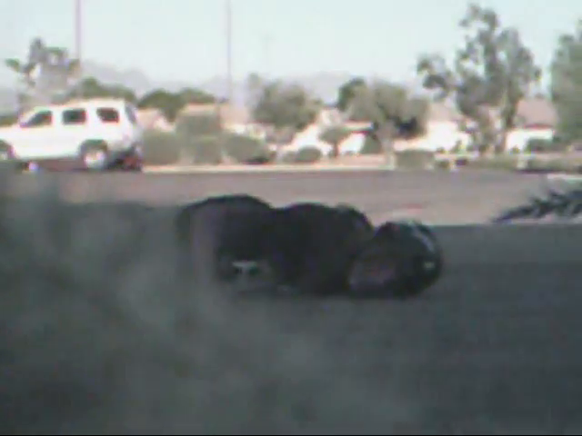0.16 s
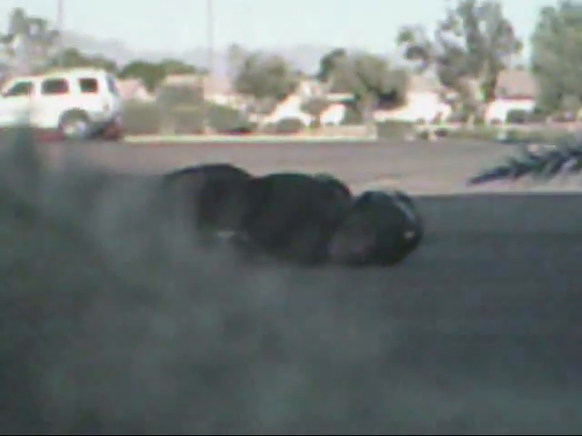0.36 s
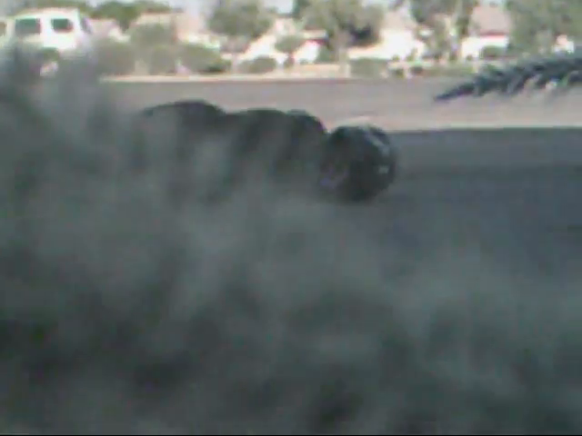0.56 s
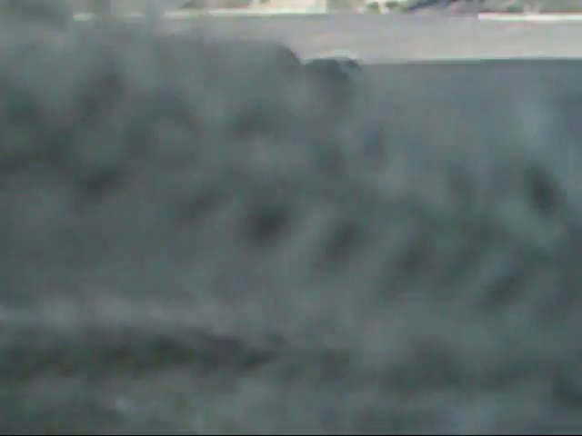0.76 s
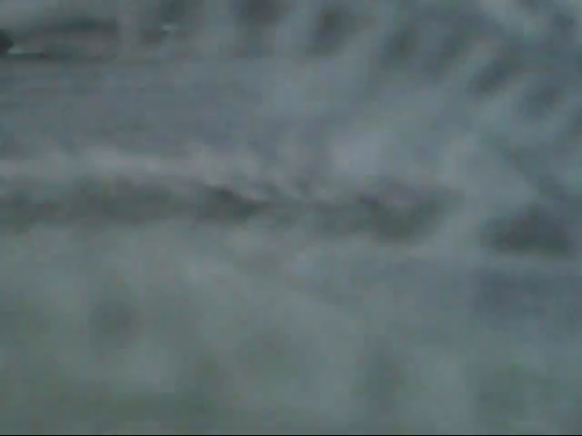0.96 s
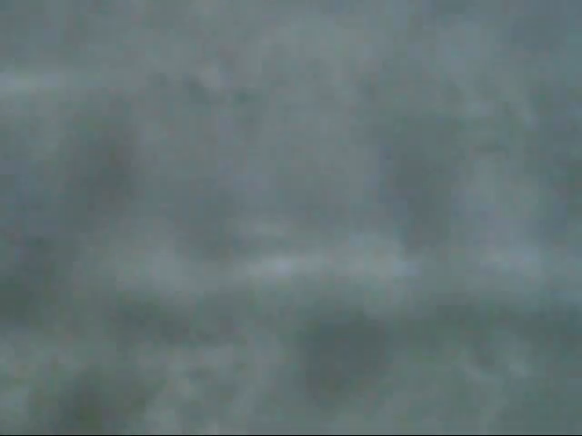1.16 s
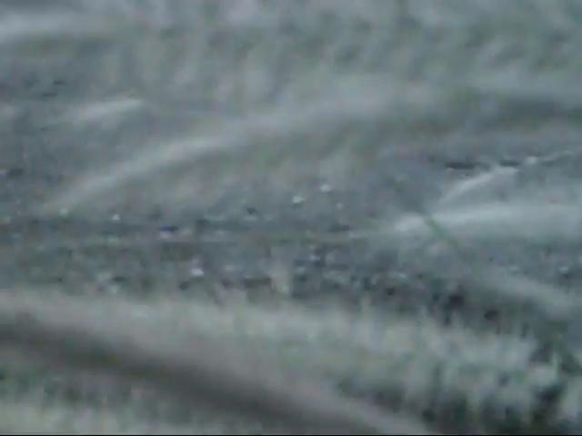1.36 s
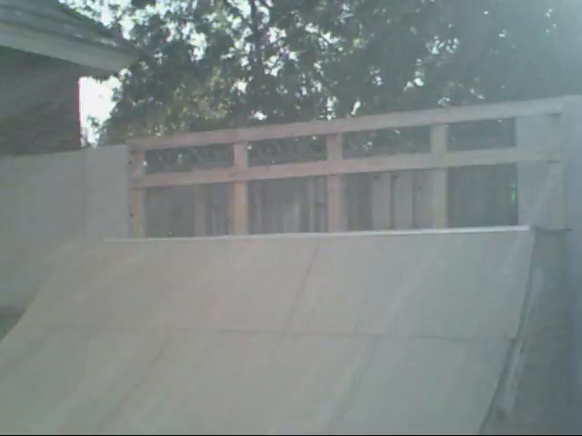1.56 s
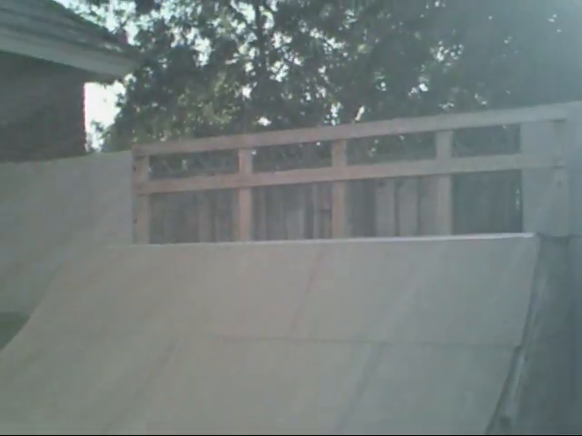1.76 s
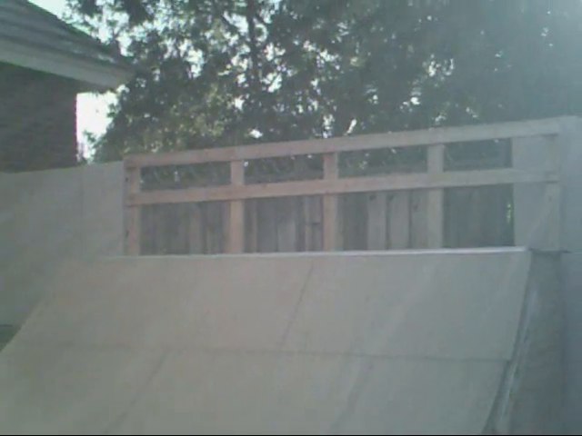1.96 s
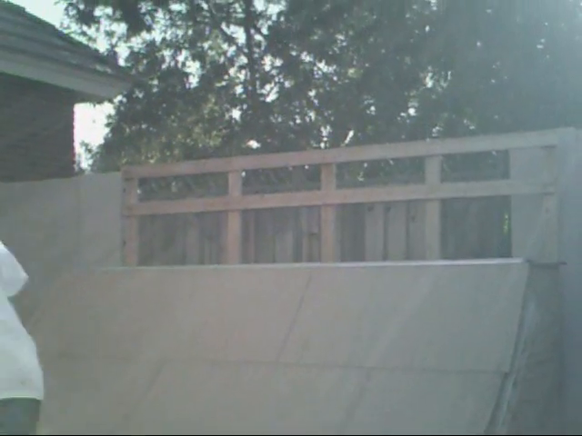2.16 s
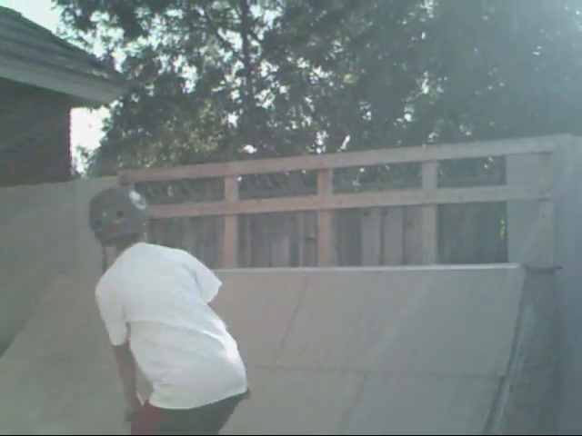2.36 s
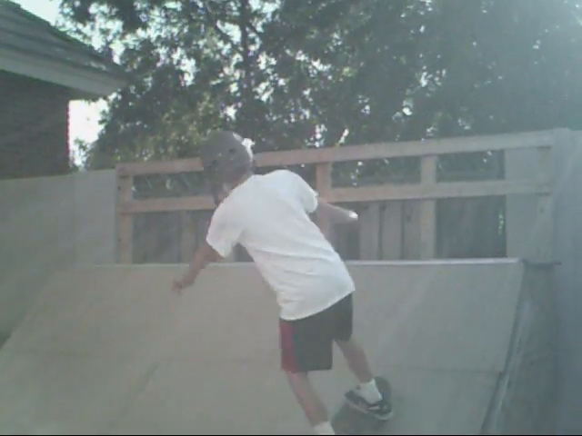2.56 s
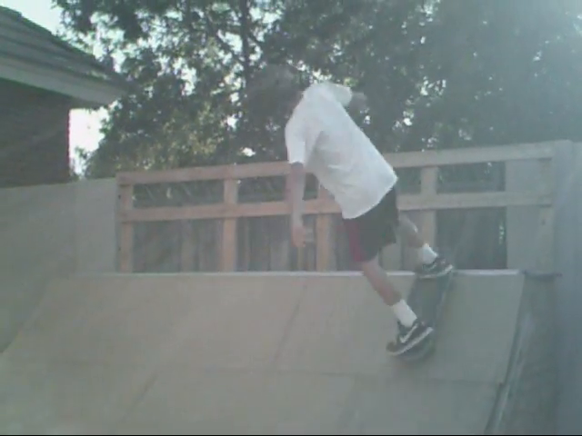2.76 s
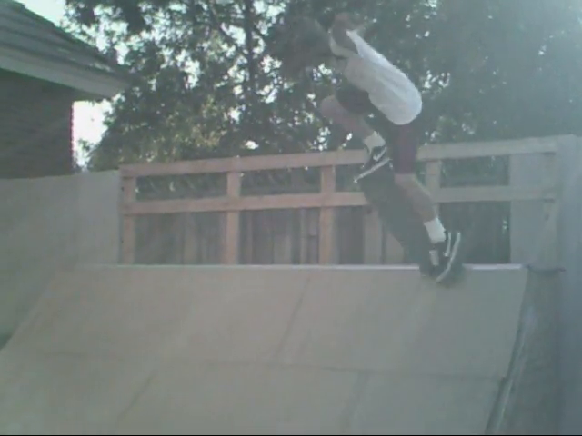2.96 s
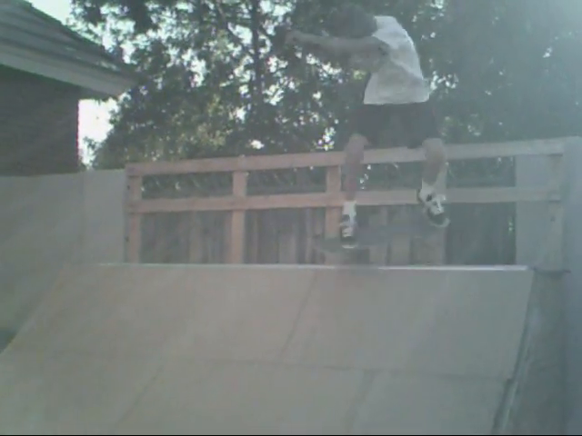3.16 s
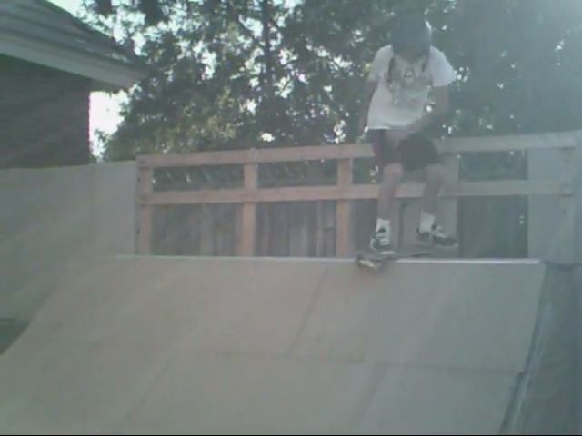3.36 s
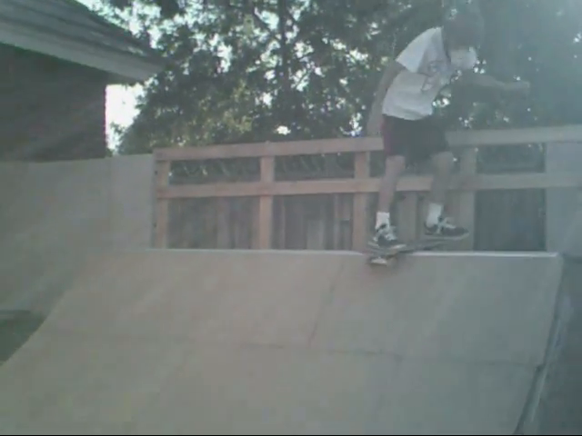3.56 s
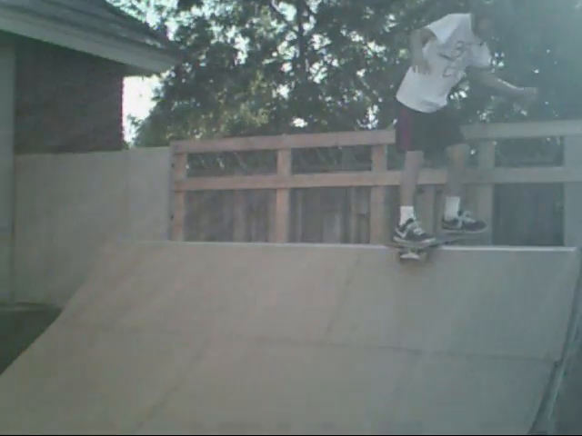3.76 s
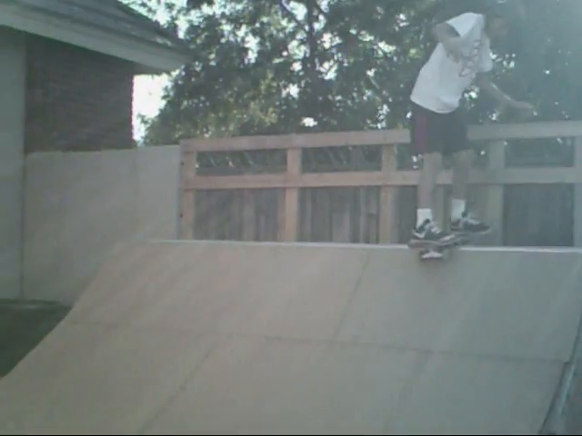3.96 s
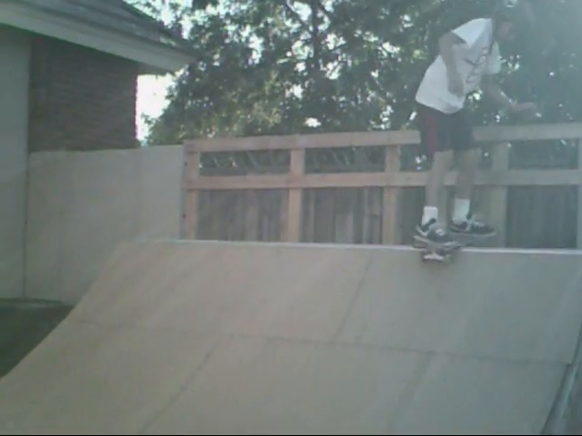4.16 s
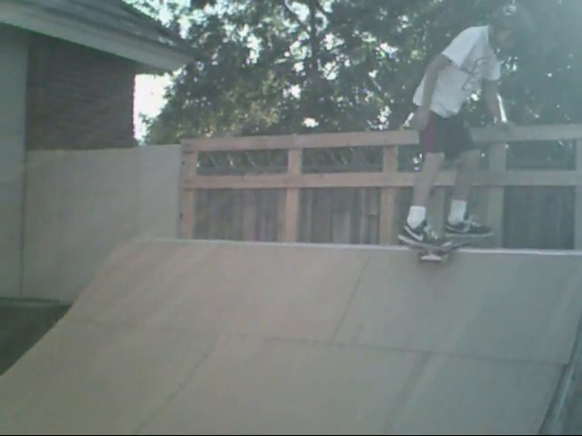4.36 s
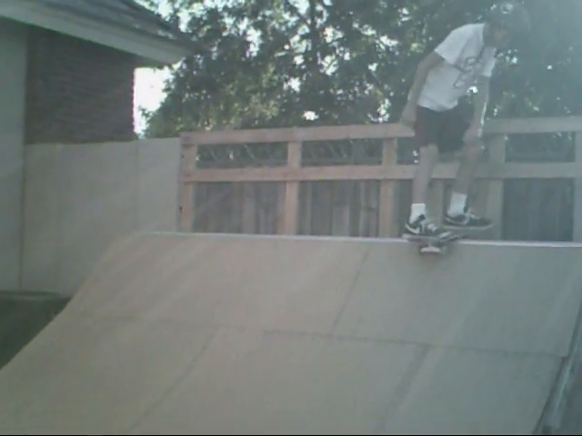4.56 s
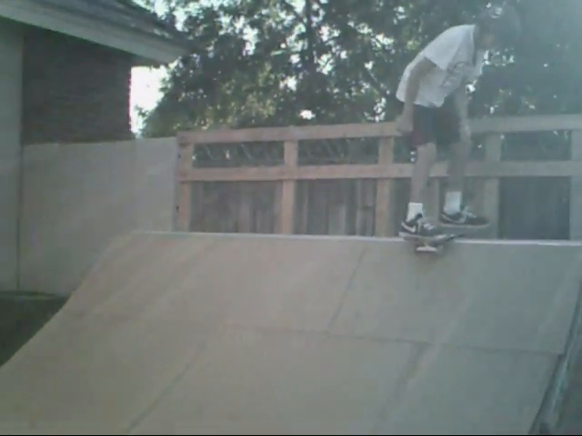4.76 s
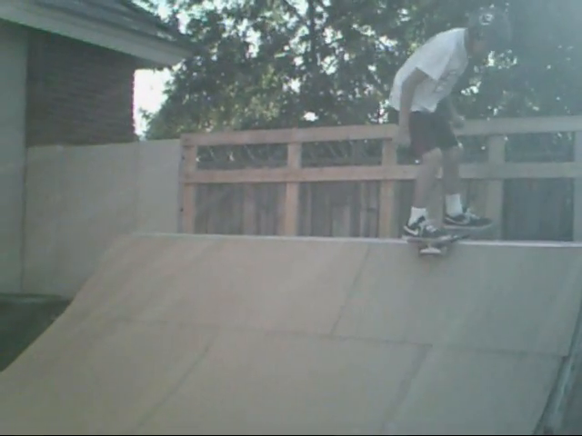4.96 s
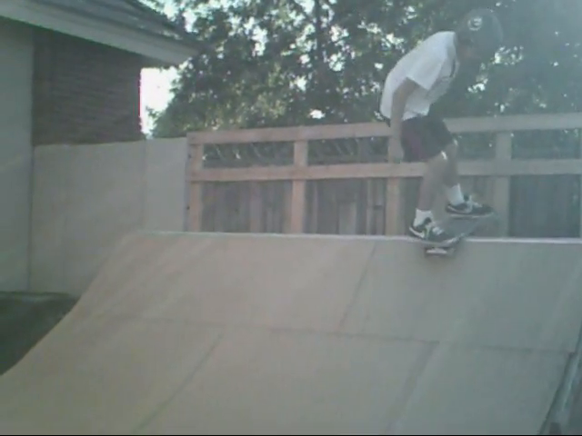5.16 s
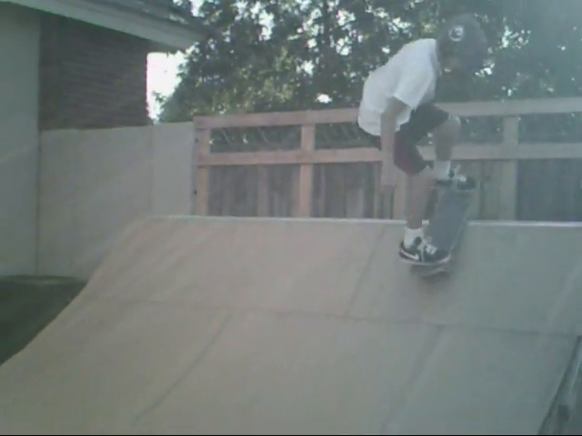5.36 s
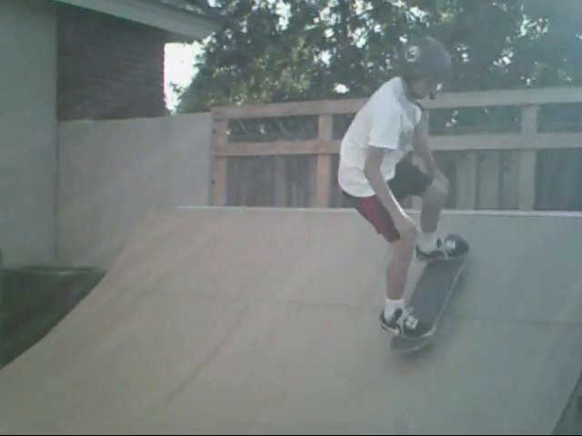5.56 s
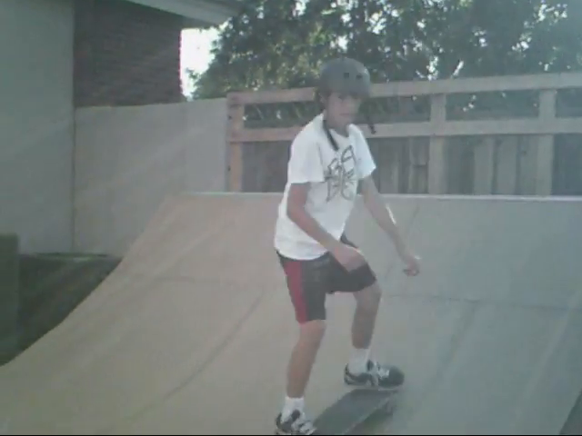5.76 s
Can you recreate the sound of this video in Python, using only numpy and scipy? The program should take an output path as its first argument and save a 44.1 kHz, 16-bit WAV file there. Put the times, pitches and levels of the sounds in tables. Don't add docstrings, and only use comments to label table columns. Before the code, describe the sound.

Outdoors, a low unsteady machine hum over distant traffic runs first, then drops out for a moment. A skateboard thumps loudly onto a hollow plywood ramp, rolls up with rumbling and knocks, and clacks sharply on the steel lip. It rests with faint creaks, then drops in with a crushing, clipped slam and rolls on. A cheap camera microphone adds thin whine and hiss.

```python
import sys
import numpy as np
from scipy import signal
from scipy.fft import rfft, irfft, next_fast_len
from scipy.io import wavfile
from scipy.ndimage import uniform_filter1d, map_coordinates

SR = 44100
rng = np.random.default_rng(int(sys.argv[2]) if len(sys.argv) > 2 else 0)


def persist_wave(psi):
    counts = np.round(np.clip(psi, -1, 1) * 32767).astype(np.int16)
    wavfile.write(sys.argv[1], SR, np.atleast_2d(counts).T)


def voltage_ratio(level):
    return 10 ** (np.asarray(level, float) / 20)


N = 255780
T = np.arange(N) / SR

DROPOUT_START_S, DROPOUT_END_S = 1.5195, 1.5855
LANDING_S = 1.6868
GAIN_CUT_S = 5.541

# centre_hz, width_hz, level_db
RAMP_FRAME = [(105.5, 42, -3), (147.3, 21.2, 1), (179.1, 28.6, -3.5), (233.7, 66.6, -5.5)]
# centre_hz, width_hz, level_db
RIDING_SHEET = [(310, 50, -0.5), (442.2, 110, -5), (601.8, 90, -6), (767, 132, -9)]
# start_s, end_s, level_db
WHEEL_SLAPS = [
    (5.4915, 5.496, 0),
    (5.4978, 5.5143, 7),
    (5.5165, 5.5192, 5),
    (5.5205, 5.5218, 3),
]


def unit(x):
    return x / np.sqrt(np.mean(x ** 2) + 1e-20)


def peak(x):
    return x / np.max(np.abs(x))


def along(points, hz):
    f, v = np.transpose(points)
    return np.interp(np.log(hz + 1), np.log(f + 1), v)


def curves(rows):
    s, *cols = np.transpose(rows)
    return [np.interp(T, s, c) for c in cols]


def during(start_s, end_s):
    return (T >= start_s) & (T < end_s)


def wobble(rate):
    knots = rng.standard_normal(int(N * rate / SR) + 4)
    return map_coordinates(knots, [np.arange(N) * rate / SR])


def filtered(x, response):
    m = next_fast_len(x.shape[-1] + 8192)
    return irfft(rfft(x, m) * response(np.fft.rfftfreq(m, 1 / SR)), m)[..., :x.shape[-1]]


def resonances(modes):
    return lambda f: sum((-1) ** k * voltage_ratio(db) * 1j * f * w / (c * c - f * f + 1j * f * w)
                         for k, (c, w, db) in enumerate(modes))


def coloured(spectrum):
    return unit(filtered(rng.standard_normal(N), lambda hz: voltage_ratio(along(spectrum, hz))))


def bumps(rate, spread_db, share):
    struck = rng.random(N) < rate / SR
    size = rng.uniform(-0.85, 1, N) * voltage_ratio(spread_db * rng.exponential(size=N).clip(0, 2))
    return share * unit(struck * size) + rng.standard_normal(N)


def whine():
    # pitch_hz, level_db
    circuit_tones = [(5599, -100), (5981, -97), (6611, -77), (7402, -80.5), (9700, -85)]
    tones = sum(np.sqrt(2) * voltage_ratio(db) * np.sin(2 * np.pi * hz * T) for hz, db in circuit_tones)
    return tones + voltage_ratio(-62.5) * rng.standard_normal(N)


def street():
    # time_s, level_db
    hum_swell = [(0.0, -32.5), (0.12, -28), (0.294, -33), (0.328, -28.5), (0.802, -38.5), (0.882, -32.5),
                 (1.19, -36.5), (1.362, -26.5), (1.51, -33)]
    # time_s, second_db, third_db
    partial_swell = [(0, -42, -52), (.15, -42, -53), (.28, -38.5, -44), (.36, -46, -47), (.45, -40.5, -50),
                     (.55, -47, -53), (.64, -41.5, -47), (.74, -50.5, -49), (.87, -44, -38.5),
                     (.96, -40.5, -48.5), (1.1, -46.5, -49), (1.2, -39.5, -51.5), (1.3, -41.5, -52),
                     (1.37, -49, -51), (1.51, -43, -47)]
    # pitch_hz, level_db (per Hz)
    traffic_spectrum = [(15, -20), (40, -3.5), (90, -1.5), (180, -4), (300, -11.5), (600, -14), (1000, -18),
                        (1500, -26.5), (2200, -37.5), (3500, -45.5), (9500, -54), (11000, -50)]
    # time_s, level_db
    brush = [(1.388, -59), (1.391, -44), (1.41, -50), (1.432, -55), (1.447, -46), (1.456, -50),
             (1.478, -51.5), (1.509, -55), (1.52, -55)]
    # pitch_hz, level_db (per Hz)
    leaf_spectrum = [(1350, -46), (2300, -13), (2900, -3), (3400, -9), (4130, -9), (4910, -5), (6860, -5),
                     (10700, -13), (13900, -49), (22000, -120)]
    turn = 2 * np.pi * np.cumsum(251 + 1.66 * wobble(11.74)) / SR
    hum = voltage_ratio(curves(hum_swell)[0] + 2 * wobble(22)) * np.sin(turn)
    overtones = sum(voltage_ratio(db + 1.5 * wobble(18.1)) * np.sin((k + 2) * turn)
                    for k, db in enumerate(curves(partial_swell)))
    traffic = voltage_ratio(-32.5 + 0.52 * wobble(5.5)) * coloured(traffic_spectrum)

    def leaf_response(hz):
        colour = voltage_ratio(along([(1700, -40)] + list(leaf_spectrum)[1:], hz))
        return colour * (1 + resonances([(3350, 500, 1)])(hz))

    scratch = bumps(500, spread_db=2.5, share=0.6) * voltage_ratio(1.3 * wobble(60))
    leaves = unit(filtered(scratch, leaf_response))
    rustle = voltage_ratio(curves(brush)[0]) * leaves * during(brush[0][0], brush[-1][0])
    return (np.sqrt(2) * (hum + overtones) + traffic + rustle) * (T < DROPOUT_START_S)


def wind():
    # start_s, level_db
    jolt_events = [(1.685, -25), (1.75, -40), (2.02, -33), (2.17, -34), (2.45, -44), (3.33, -18),
                   (3.41, -20.5), (3.7, -33), (4.28, -39), (4.42, -34), (4.6, -35), (5.2, -26), (5.51, -20),
                   (5.6, -34)]
    # pitch_hz, level_db (per Hz)
    buffet_spectrum = [(12, -2.5), (30, -10.5), (70, -5.5), (110, -18), (160, -59.5)]
    # time_s, level_db
    murmur_level = [(1.58, -60), (1.69, -47), (3.3, -46), (3.6, -42.5), (3.9, -46), (4.3, -43),
                    (4.7, -38.5), (5.1, -34.5), (5.5, -27.5), (5.55, -60), (5.8, -33)]
    # pitch_hz, level_db (per Hz)
    murmur_spectrum = [(53, -26), (90, -10.5), (189, 6), (260, 1.5), (330, -25), (613, -6), (811, -4.5),
                       (1120, -19), (1510, -16.5), (1770, -24), (2340, -18.5), (6750, -36), (10700, -47),
                       (13900, -75), (22000, -120)]
    # centre_hz, width_hz, level_db
    drones = [(790, 100, -1.5), (1519, 110, 8)]
    rise_s, t60_s = 0.012, 0.474
    jolts = 0
    for s, db in jolt_events:
        u = (T - s).clip(0)
        jolts = jolts + voltage_ratio(db - 60 * u / t60_s) * (1 - np.exp(-u / rise_s))
    breeze = voltage_ratio(-37 + 3 * wobble(16) - 26 * (T < LANDING_S))
    buffet = unit(voltage_ratio(1.5 * wobble(22)) * coloured(buffet_spectrum))
    murmur = unit(filtered(coloured(murmur_spectrum), lambda f: 1 + resonances(drones)(f)))
    return (breeze + jolts) * buffet + voltage_ratio(curves(murmur_level)[0]) * murmur


def shuffles():
    # start_s, length_s, level_db
    drags = [(1.67, 0.15, -49), (1.902, 0.26, -53), (3, 0.45, -52.5), (3.91, 0.24, -56),
             (4.114, 0.067, -65), (4.468, 0.12, -53.5), (5.174, 0.12, -55), (5.347, 0.077, -46),
             (5.543, 0.039, -28.5), (5.521, 0.02, -21.5), (5.42, 0.092, -41.5), (3.43, 0.35, -58)]
    # centre_hz, width_hz, level_db
    sole_modes = [(3400, 780, -4.5), (4830, 900, -4.5), (7500, 2200, -7)]
    drag = sum(voltage_ratio(db) * np.sin(np.pi * ((T - s) / length).clip(0, 1)) for s, length, db in drags)
    rub = bumps(500, spread_db=2.5, share=0.7) * voltage_ratio(2 * wobble(50))
    grains = filtered(rub, lambda f: resonances(sole_modes)(f) / (1 + (2500 / (f + 1)) ** 4))
    return drag * unit(grains)


def ticks():
    # start_s, level_db, centre_hz
    creaks = [(0.3256, -33, 5270), (0.928, -43, 4030), (0.9694, -42, 4770), (1.4451, -47, 4980),
              (3.909, -38, 4600), (4.0294, -50, 7960), (4.2716, -34, 5000), (4.36, -43, 4750),
              (4.877, -37, 4150), (4.9264, -37, 4700), (4.9906, -34, 4990), (5.016, -32, 4900),
              (5.03, -38, 4800), (5.063, -31, 4470), (5.088, -37, 4500), (5.1103, -45, 4700),
              (5.148, -34, 5170), (5.1755, -28, 4740), (5.193, -29, 6500), (5.2034, -26, 6500),
              (5.2433, -36, 5230), (5.287, -23, 4070), (5.3307, -23.5, 4650), (5.42, -21, 4230)]
    # start_s, level_db, centre_hz, width_hz, t60_s
    snaps = [(5.6052, -24, 3800, 1200, .015), (3.3333, -5, 2200, 2000, .012), (5.588, -11, 3300, 700, .03),
             (2.178, -15, 450, 300, .08), (1.6866, -9, 800, 600, .03), (1.7645, -11, 400, 400, .08),
             (3.332, -7, 760, 110, .12), (1.3903, -20, 8600, 4000, .015), (5.4195, -21, 2300, 900, .02),
             (2.9095, -20, 4500, 3000, .03), (5.5868, -21, 8500, 3500, .04), (3.6985, -19, 1450, 260, .07),
             (3.701, -20, 1950, 300, .06), (3.571, -30, 1400, 170, .08), (1.389, -38, 3000, 2000, .03),
             (3.345, -11, 145, 45, .2), (2.909, -15, 1300, 350, .05), (5.229, -21, 1330, 200, .05),
             (1.698, -10, 570, 90, .13), (3.71, -24, 170, 50, .2), (.3249, -33, 1900, 700, .02)]
    # start_s, level_db, centre_hz
    shivers = [(1.4685, -39, 3300), (1.481, -41, 3300), (1.487, -45, 6500), (1.497, -41, 3200),
               (1.885, -36, 8500), (1.91, -48, 9000), (2.009, -38, 8800), (2.018, -38, 7500),
               (2.074, -35, 7000), (2.117, -44, 9000), (2.134, -42, 9800), (2.172, -39, 8500),
               (2.18, -43, 7370), (2.33, -44, 7100), (3.96, -44, 4780), (4.031, -53, 7800),
               (4.953, -49, 8500), (4.969, -49, 9000), (5.056, -40, 7500), (5.231, -28.5, 7550),
               (5.249, -37, 5500), (5.372, -44, 8600), (5.384, -46, 7500), (1.476, -43, 3300),
               (1.507, -46, 3300), (1.512, -43, 3400), (1.404, -37, 9200)]
    out, t = np.zeros(N + SR), np.arange(SR // 7) / SR
    fade = np.cos(np.pi / 2 * t / t[-1])
    puffs = [(*creak, 2000, 0.016, 5.9) for creak in creaks]
    puffs += [(*snap, 5.9) for snap in snaps]
    puffs += [(*shiver, 1600, 0.031, 0) for shiver in shivers]
    for s, db, hz, width_hz, t60_s, push in puffs:
        puff = (rng.standard_normal(len(t)) + push) * voltage_ratio(-60 * t / t60_s)
        tick = filtered(puff, lambda f: resonances([(hz, 1.4 * width_hz, 0)])(f) ** 2)
        out[round(s * SR):][:len(t)] += voltage_ratio(db) * fade * peak(tick)
    return out[:N]


def pop():
    u = (T - 4.7282) / 0.00045
    return -voltage_ratio(-13) * np.cos(np.pi / 2 * u) * ((u >= 0) & (u < 1))


def chatter():
    # time_s, level_db
    bearing_level = [(4.8, -71), (5.0, -59), (5.3, -60), (5.45, -48), (5.49, -45)]
    clicks_per_s = 90 * voltage_ratio(3 * wobble(40))
    clicks = np.diff(np.floor(np.cumsum(clicks_per_s) / SR), prepend=0) * voltage_ratio(4 * rng.standard_normal(N))
    axle = unit(filtered(clicks, lambda f: resonances([(4900, 1900, 0)])(f) ** 2))
    return voltage_ratio(curves(bearing_level)[0]) * during(bearing_level[0][0], bearing_level[-1][0]) * axle


def knocks():
    # start_s, level_db, pitch_hz, rise_s, t60_s
    panel_knocks = [(1.379, -20, 70, .003, .03), (1.911, -20, 130, .006, 0.1),
                    (2.025, -16, 266, .006, 0.22), (2.072, -15, 107, 0.0073, 0.19),
                    (2.29, -25, 790, 0.003, 0.057), (2.353, -18, 156, 0.0053, 0.17),
                    (2.362, -15, 368, .005, 0.12), (2.437, -18.5, 337, 0.0046, 0.12),
                    (2.462, -12.5, 177, 0.0055, .1), (2.54, -13.5, 182, 0.0055, 0.19),
                    (2.585, -16.5, 296, .006, .1), (2.608, -13.5, 135.5, 0.0045, 0.14),
                    (2.678, -31, 867, 0.0065, 0.12), (2.91, -10, 788, 0.00074, 0.025),
                    (2.005, -30, 199, .003, 0.091), (2.195, -17, 332, .004, 0.082),
                    (2.25, -22, 151, 0.0073, 0.19), (2.7, -20, 331, 0.0053, .12),
                    (3.7025, -24, 1900, 0.001, 0.11), (3.36, -28, 1010, 0.0035, 0.12),
                    (2.911, -40, 3250, .002, 0.17), (5.407, -16.5, 735, 0.0021, 0.033),
                    (5.419, -14, 762, 0.0013, 0.027), (5.436, -14.5, 830, 0.0027, .14),
                    (5.439, -19, 1417, .005, 0.095), (5.452, -9.5, 750, 0.0028, 0.036),
                    (5.478, -12, 735, 0.0053, 0.11), (5.526, -10.5, 503, 0.0032, 0.066),
                    (5.588, -18, 1583, 0.0012, 0.031), (5.595, -9, 91, 0.0018, 0.026),
                    (5.5885, -6, 745, 0.00027, 0.015), (1.768, -18, 193, .003, 0.05),
                    (3.42, -22, 198, 0.0076, 0.25), (1.75, -26, 152.2, 0.013, 0.24),
                    (2.17, -23, 394, 0.0095, 0.33), (5.378, -22.5, 289, .003, .08),
                    (5.396, -19.5, 292, 0.0032, 0.07), (5.5925, -12.5, 846, .0008, 0.015),
                    (2.912, -24, 324, .001, .04)]
    # start_s, level_db, pitch_hz
    screw_knocks = [
        (1.748, -13, 444),
        (1.861, -27, 432),
        (1.94, -19.5, 416),
        (1.99, -22.5, 372),
        (2.163, -18, 334),
        (2.516, -20.5, 433),
        (2.561, -20, 315),
    ]
    # start_s, level_db, pitch_hz
    wheel_pings = [
        (1.7182, -33, 1640),
        (1.9464, -39, 1730),
        (2.1718, -32, 1496),
        (2.2104, -32, 1510),
        (2.2969, -31.5, 1490),
        (2.3373, -38, 1470),
        (2.5029, -32.5, 1480),
        (2.631, -39, 1430),
        (2.7633, -33, 1330),
        (2.788, -32.5, 1370),
    ]
    out, t = np.zeros(N + SR), np.arange(SR // 5) / SR
    fade = np.cos(np.pi / 2 * t / t[-1])
    events = panel_knocks + [(*knock, 0.0034, 0.075) for knock in screw_knocks]
    events = events + [(*ping, 0.0017, 0.07) for ping in wheel_pings]
    for s, db, hz, rise_s, t60_s in events:
        drift = 0.002 * np.sqrt(hz) * np.cumsum(rng.standard_normal(len(t)))
        slow = uniform_filter1d(uniform_filter1d(rng.standard_normal(len(t)), size=150), size=150)
        flutter = voltage_ratio(2.5 * unit(slow))
        envelope = flutter * (1 - np.exp(-t / rise_s)) ** 2 * fade * voltage_ratio(-60 * t / t60_s)
        ring = envelope * np.sin(2 * np.pi * hz * t + uniform_filter1d(drift, size=60))
        out[round(s * SR):][:len(t)] += voltage_ratio(db) * peak(ring)
    return out[:N]


def rolling():
    # time_s, wheel_db, hollow_db
    roll_level = [(1.59, -61.5, 13), (1.685, -62.5, 15), (1.695, -31.5, 13), (1.775, -32.5, 15.5),
                  (1.8, -39, 12), (2.09, -39, 11), (2.33, -37.5, 13.5), (2.62, -40, 15.5), (2.88, -39.5, 6),
                  (3.2, -49, -5.5), (3.45, -63.5, 23), (3.9, -56, 13), (4.7, -50, 13), (5.2, -41.5, 3.5),
                  (5.37, -40, 9.5), (5.47, -24.5, -7.5), (5.57, -47, 15.5), (5.8, -44, 11)]
    # start_s, level_db
    seams = [(2.007, 7), (2.073, 6.5), (2.169, 1), (2.357, 2.5), (2.435, 7.5), (2.581, 4.5), (2.931, 13.5),
             (3.06, 11.5), (3.701, 16.5), (2.13, -3), (2.325, -6), (2.405, -2)]
    # centre_hz, width_hz, level_db
    wheel_modes = [(1010, 340, -4.5), (1510, 163, 2.5), (2109, 280, -2), (2559, 315, -7),
                   (3300, 390, -13.5)]
    # time_s, middle_db, top_db
    speed_tones = [(1.6, -6, 1), (1.8, -0.5, 2), (1.93, -7.5, 7.5), (2.08, 0.5, 8), (2.25, -5, 3),
                   (2.45, 1, 0), (2.9, -5, -3), (3.3, 3.5, 6.5), (4.7, -0.5, 0), (5.15, -0.5, -5),
                   (5.4, -2, 5), (5.8, -5.5, -9)]
    # pitch_hz, level_db (per Hz)
    grit_spectrum = [(1760, -33), (3000, -22), (3300, -0.5), (4570, -2.5), (7060, 0.5), (9460, -9),
                     (10700, -7), (13900, -60), (22000, -120)]
    wheel_db, hollow_db = curves(roll_level)
    hollow_db = hollow_db + sum(db * np.exp(-abs(T - s) / 0.093) * (T > s) for s, db in seams)
    frame_db = wheel_db + hollow_db - 0.5 + 1.5 * wobble(7)
    sheet_db = wheel_db + 0.64 * hollow_db + 3
    grit_db = -17 + 0.88 * wheel_db
    load = wobble(18)

    road = bumps(700, spread_db=2.5, share=1.5)
    frame = filtered(road * voltage_ratio(0.27 * load), resonances(RAMP_FRAME))
    clumps = voltage_ratio(0.9 * load + 0.9 * wobble(30))
    sheet = filtered(road * clumps, lambda f: resonances(RIDING_SHEET)(f) / (1 + (f / 950) ** 4))

    tread = bumps(1200, spread_db=4.5, share=0.6) * voltage_ratio(1.2 * load)
    wheels = filtered(tread, lambda f: resonances(wheel_modes)(f) / (1 + (900 / (f + 1)) ** 6))
    tones = [filtered(wheels, resonances([(hz, 1.4 * width_hz, 0)])) for hz, width_hz, _ in wheel_modes[2:]]
    middle_db, top_db = curves(speed_tones)
    for tone, db in zip(tones, (middle_db, middle_db, top_db)):
        wheels = wheels + (voltage_ratio(db + 1.5 * wobble(14)) - 1) * tone

    grit_colour = [(2750, -47)] + list(grit_spectrum)[2:]
    grit = filtered(bumps(400, spread_db=4, share=0.5) * voltage_ratio(load), lambda hz: voltage_ratio(along(grit_colour, hz)))
    ramp = voltage_ratio(frame_db) * unit(frame) + voltage_ratio(sheet_db) * unit(sheet)
    return ramp + voltage_ratio(wheel_db) * unit(wheels) + voltage_ratio(grit_db) * unit(grit)


def yard(x):
    # pitch_hz, t60_s
    yard_decay = [(100, 0.34), (800, 0.36), (3000, 0.26), (10000, 0.21)]
    hz, t, z = signal.stft(rng.standard_normal(SR // 3), SR, nperseg=256)
    dying = z * voltage_ratio(-60 * t / along(yard_decay, hz)[:, None])
    tail = signal.istft(dying, SR, nperseg=256)[1]
    return signal.fftconvolve(np.pad(x, (250, 0)), tail / np.linalg.norm(tail))[:len(x)]


def hits():
    # start_s, deck_db, thud_db, metal_db, t60_s
    sharp_blows = [(1.606, -37.5, -10, -23, 0.11), (1.764, -14, -1.5, -20, 0.2), (2.078, -36, 8, -13, 0.37),
                   (2.588, -40.5, 26.5, -19, 0.35), (2.909, -18.5, -15, 3.5, 0.06),
                   (3.332, -12.5, -4.5, 7.5, 0.076), (3.337, -8, -5, 4, 0.017), (3.353, -23, 9, 12.5, 0.23),
                   (3.5703, -39.5, -4, 8.5, 0.25), (3.698, -32.5, -7, 13, 0.3), (5.6049, -30, 3, 4, 0.03)]
    # start_s, deck_db, thud_db, metal_db, t60_s
    soft_blows = [(1.715, -18.5, 2, -13, 0.25), (3.056, -25.5, -2.5, -3, 0.16), (5.223, -25, 5.5, 0, 0.23),
                  (5.332, -35.5, 12, -4, 0.19), (3.323, -39, -14, 25, 0.13), (3.326, -14, 2, -4.5, 0.12),
                  (3.345, -29, 16, -3, 0.18), (3.385, -24, 2.5, -19, 0.27), (5.585, -20, 2, 3.5, 0.043),
                  (5.406, -19, -2.5, -18, 0.66), (5.47, -20.5, -9, 2, 0.59)]
    # centre_hz, width_hz, level_db
    deck_modes = [(620, 160, -5), (750, 150, 0), (910, 200, -4)]
    # centre_hz, width_hz, level_db
    truck_modes = [(1384, 230, -4), (1937, 180, -6), (2130, 430, -10.5), (3530, 690, -12.5),
                   (4440, 1800, -18)]
    out, t = np.zeros(N + SR), np.arange(SR // 3) / SR
    hardness = 1 + 1.9 * np.exp(-t / 0.006)
    blows = [(*hit, 0.000068) for hit in sharp_blows] + [(*hit, 0.0036) for hit in soft_blows]
    for s, db, thud_db, metal_db, t60_s, rise_s in blows:
        contact = rng.standard_normal((4, len(t))) * (1 - np.exp(-t / rise_s)) * hardness
        deck = filtered(contact[0] * voltage_ratio(-60 * t / t60_s),
                        lambda f: resonances(deck_modes)(f) / (1 + 1j * f / 1300) ** 2)
        thud = filtered(contact[1] * voltage_ratio(-40 * t / t60_s), resonances(RAMP_FRAME + RIDING_SHEET[:2]))
        trucks = filtered(contact[2] * voltage_ratio(-70 * t / t60_s), resonances(truck_modes))
        crack = filtered(contact[3] * voltage_ratio(-80 * t / t60_s),
                         lambda f: resonances([(7500, 6000, 0)])(f) ** 2)
        metal = peak(trucks) + voltage_ratio(-13) * peak(crack)
        blow = peak(deck) + voltage_ratio(thud_db) * peak(thud) + voltage_ratio(metal_db) * metal
        out[round(s * SR):][:len(t)] += voltage_ratio(db) * (blow + voltage_ratio(-7) * yard(blow))
    return out[:N]


def landing():
    t = T - LANDING_S
    length_s = 1.6983 - LANDING_S
    turn = 2 * np.pi * 470 * t
    swing = np.sin(turn) + 0.5 * np.sin(1.4 * turn * (1 + 15 * t)) + 0.4 * np.sin(2.05 * turn)
    scrape_spectrum = [(300, -26), (1100, 3), (2500, -8), (4000, -17.5), (8000, -19), (11000, -35)]
    scrape = voltage_ratio(-19) * coloured(scrape_spectrum)
    rise = np.clip(t / 0.0055, 0, 1) ** 1.3
    return (voltage_ratio(-3) * rise * swing + scrape) * ((t > 0) & (t < length_s))


def slam():
    # pitch_hz, level_db (per Hz)
    boom_spectrum = [(20, -37), (60, 0.5), (250, 3), (800, -9), (1500, -24), (3000, -65.5)]
    # pitch_hz, level_db (per Hz)
    clatter_spectrum = [(200, -18), (700, 4.5), (3000, -4), (6000, -14), (11000, -24)]
    first = WHEEL_SLAPS[0][0]
    run_up = voltage_ratio(-14) * np.exp(-abs(T - first) / 0.012) * (T < first)
    cut = np.where(T < GAIN_CUT_S, 1, voltage_ratio(-11 - 900 * abs(T - GAIN_CUT_S)))
    shudder = voltage_ratio(-14.5) * (T >= first) * cut
    slaps = uniform_filter1d(sum(voltage_ratio(db) * during(a, b) for a, b, db in WHEEL_SLAPS), size=40)
    heave_s, heave_end_s, heave_hz = 5.522, 5.5395, 44
    heave = voltage_ratio(-10) * np.sin(2 * np.pi * heave_hz * (T - heave_s)) * during(heave_s, heave_end_s)
    boom = (run_up + shudder + slaps) * coloured(boom_spectrum)
    clatter = (run_up + shudder + voltage_ratio(-4.5) * slaps) * coloured(clatter_spectrum)
    return heave + boom + clatter


def scene():
    background = whine() + street() + (rolling() + wind()) * (T > DROPOUT_END_S)
    details = shuffles() + ticks() + pop() + chatter() + knocks()
    return (background + details + hits() + landing() + slam())[None]


def top_cut(x):
    return signal.sosfilt(signal.butter(12, 15760, fs=SR, output="sos"), x)


def record(dry):
    # start_s, end_s
    overloads = [
        (1.69, 1.696),
        (3.3328, 3.3338),
    ]
    top_hz = 10850
    half = filtered(dry, lambda hz: hz < SR / 4)[:, ::2] - 0.013
    wrapped = (half + 1) % 2 - 1
    doubled = np.zeros_like(dry)
    doubled[:, ::2] = 2 * np.where(abs(half) > 1.5, wrapped, half.clip(-1, 1))

    band_edge = [(9600, 0), (10500, -6), (top_hz, -14), (top_hz + 60, -120)]
    mirror_edge = [(top_hz, -120), (top_hz + 60, -30), (11800, -36), (14500, -32), (15700, -38), (15900, -120)]
    band = filtered(doubled, lambda hz: voltage_ratio(along(band_edge, hz)))
    mirror = filtered(doubled, lambda hz: voltage_ratio(along(mirror_edge, hz)))

    live = (T < DROPOUT_START_S) + np.clip((T - DROPOUT_END_S) / 0.002, 0, 1)
    slam_gain = during(WHEEL_SLAPS[0][0], GAIN_CUT_S + 0.006) * voltage_ratio(11 * (T > WHEEL_SLAPS[-1][1]))
    overload_gain = voltage_ratio(3) * sum(during(a, b) * 1.0 for a, b in overloads)
    mix = np.clip(band * live + mirror * (slam_gain + overload_gain), -1, 1)
    return top_cut(mix)


dry = scene()
out = record(dry)
persist_wave(out)
```